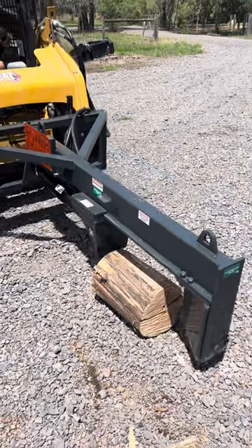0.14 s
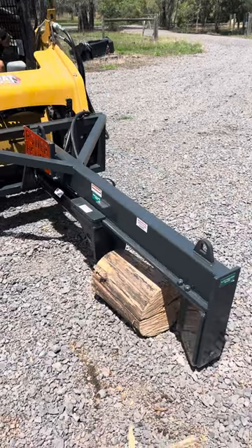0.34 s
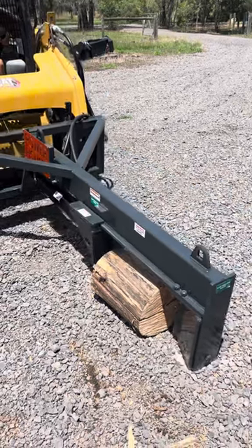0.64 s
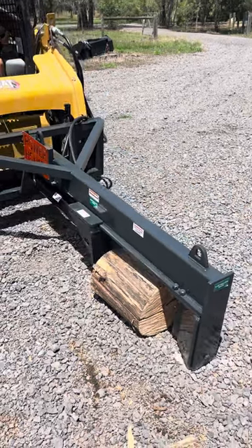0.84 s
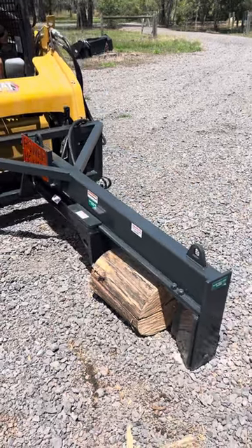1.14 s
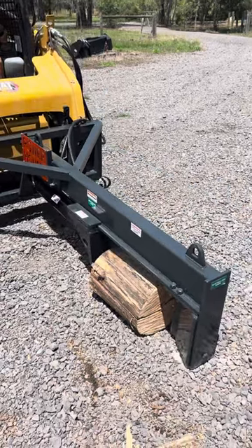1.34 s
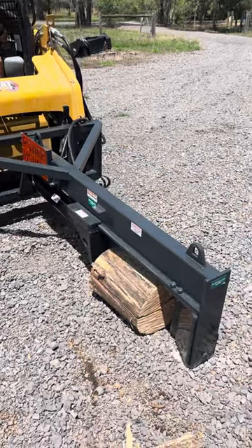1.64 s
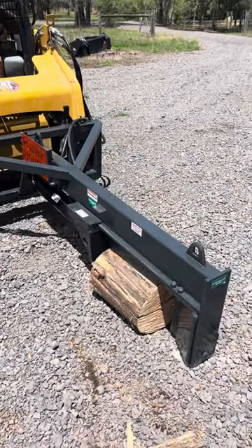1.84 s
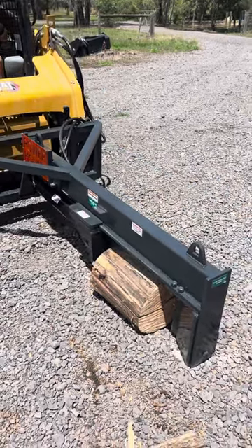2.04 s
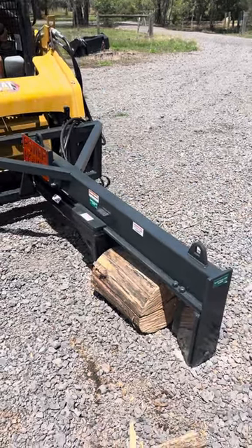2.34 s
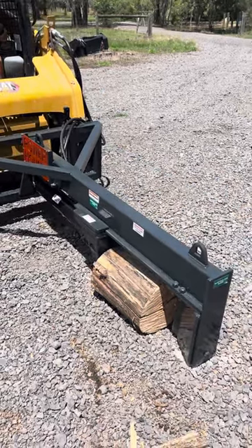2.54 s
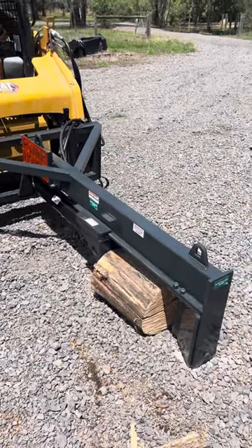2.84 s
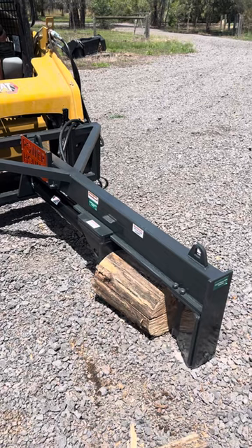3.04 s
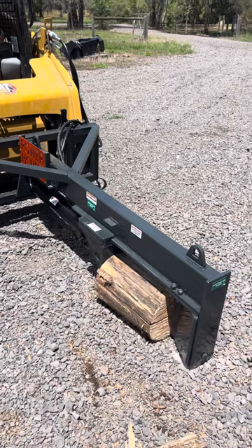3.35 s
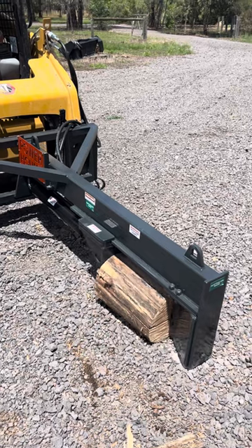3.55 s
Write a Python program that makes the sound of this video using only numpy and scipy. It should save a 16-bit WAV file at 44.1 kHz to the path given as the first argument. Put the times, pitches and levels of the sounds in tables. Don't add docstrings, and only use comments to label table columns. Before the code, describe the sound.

A high-idling diesel loader drones close by outdoors on gravel; it sags as the hydraulic ram strains, recovers with small crunches and a wind puff, and a log cracks at the end, caught by a phone.

```python
import sys
import numpy as np
from scipy import signal
from scipy.fft import rfft, irfft
from scipy.io import wavfile

SR = 44100
rng = np.random.default_rng(int(sys.argv[2]) if len(sys.argv) > 2 else 0)


def master(y):
    cut = np.clip(np.atleast_2d(y).T, -1, 1)
    pcm = np.round(cut * 32767)
    wavfile.write(sys.argv[1], SR, pcm.astype(np.int16))


def decibels_to_gain(level_db):
    exponent = np.asarray(level_db, float) / 20
    return 10 ** exponent


N = 162288

# time [s], rate [Hz].
FIRING = [(0, 81.56), (0.6, 81.8), (1.12, 81.84), (1.22, 79.37), (1.32, 75.85), (1.4, 75.82), (1.55, 76.87),
          (1.7, 77.03), (1.9, 77.0), (1.98, 80.36), (2.08, 82.3), (2.18, 81.75), (2.5, 81.68), (3.0, 81.69),
          (3.5, 81.66), (3.62, 81.34), (3.68, 81.34)]
FREE_HZ, SAG_HZ = 81.51, 6.24
# multiple of firing rate, level [dB], gain at full load [dB], phase [rad].
EXHAUST = [(.75, -45.5, -13, -3.1), (1, -11, 3, 0.52), (1.25, -36.5, -21, 8), (1.5, -38.5, -6.5, 6),
           (1.75, -44, 1.5, 3), (2, -23, 11, -1), (2.5, -48, -4.5, 2), (2.75, -57, 9.5, 1.5),
           (3, -37, 7, 2.5), (3.5, -52, -4, 2.96), (3.75, -54.5, 4, 2.3), (4, -46, 4, 0),
           (4.5, -63.5, -1.5, 6), (5.25, -57.5, 9, 3), (5.5, -60.5, 2.5, -1.9), (6, -43.5, -4, 1.44),
           (7, -48, -6.5, 7), (9, -52.5, 0.5, 0.26), (11, -53.5, -1, 5), (12, -58.5, 12.5, 5.5),
           (15, -50, 3, 6), (18, -58.5, -24.5, 6.5)]
# time [s], level of its tone [dB], strain lifting its overtones [dB].
PUMP = [(0, -48, -25), (1.15, -46, -25), (1.162, -36, -25), (1.2, -36, -22), (1.3, -36, -18),
        (1.46, -32, -14), (1.48, -30, -.1), (1.86, -31, -.1), (1.93, -45, -15), (2.06, -46, -20),
        (2.1, -31, -22), (3.5, -32, -22), (3.68, -32, -22)]
# multiple of the piston tone, level under it [dB].
PUMP_OVERTONES = [(2, -17), (3, -22), (4, -15.5), (6, -23), (10, -31), (12, -36)]
CYLINDER_DB = [-0.3, -17.5, -14, -1]
# frequency [Hz], density [dB per Hz].
BODY = [(25, -65), (60, -56.5), (130, -58.5), (300, -61), (550, -66), (900, -67.5), (1400, -74),
        (1800, -79.5)]
# frequency [Hz], density [dB per Hz].
HISS = [(1300, -93.5), (1900, -78), (3000, -75.5), (4000, -82), (6000, -87), (8600, -92.5), (11000, -94),
        (16500, -105)]
# multiple of its turning rate, level [dB], phase [rad].
FAN_TONES = [(7, -38, 1.5), (12, -41.5, 4.37), (14, -49.5, 2.2)]
# start [s], rise [s], fall [s], level [dB], tilt [dB per octave].
GRINDS = [(.003, .002, .03, -36, -9), (.505, .025, .022, -41, -2), (.6925, .0005, .001, -35, .5),
          (.7172, .0004, .0007, -33, 10), (.67, .03, .02, -49, 0), (1.157, .002, .03, -37, -16),
          (1.982, .001, .007, -30, -.5), (1.999, .003, .022, -27, -5), (3.507, .002, .03, -21, -8),
          (2.04, .008, .02, -33, -5), (2.0565, .001, .006, -34, .8), (2.065, .012, .04, -36, -3),
          (3.445, .002, .004, -52, 3), (3.547, .002, .04, -33, 0), (3.581, .004, .01, -22, -1.5),
          (3.594, .001, .002, -16, 2.5), (3.607, .004, .01, -24, -5), (3.62, .001, .007, -23, -3),
          (3.633, .001, .007, -23, -2.5), (3.648, .003, .008, -21, -3), (3.662, .006, .03, -24, -3)]
# frequency [Hz], width [Hz], boost [dB].
LOG_RESONANCES = [(430, 380, -4.5), (714, 320, 9), (1035, 310, 5), (1240, 87, 4.5), (2420, 1400, 4)]
# time [s], level [dB].
CRACK_BLOWS = [
    (3.5077, -15.5),
    (3.509, -21.5),
    (3.518, -12.5),
    (3.527, -12),
    (3.536, -22.5),
    (3.551, -21.5),
]
# frequency [Hz], level [dB], time to fall 60 dB [s].
CRACK_MODES = [(410, -9.5, 0.0088), (692, -40, 0.069), (1165, 5.5, 0.029), (1350, -1.5, 0.023),
               (1313, -5, 0.049), (1454, -1, 0.065), (1900, -6, 0.031), (2210, -10.5, 0.03),
               (2376, -12.5, 0.073), (3540, -15, 0.036)]
# time [s], pitch [Hz], level [dB].
SNAPS = [(1.158, 414, -22.5), (1.161, 560, -28), (1.178, 492, -27.5), (1.2, 430, -31.5), (1.225, 402, -25),
         (2.002, 618, -18.5), (2.002, 339, -20.5), (2.002, 1017, -25), (2.011, 993, -30.5),
         (2.017, 720, -19), (2.02, 1310, -31.5), (2.033, 690, -25.5), (2.042, 540, -30),
         (2.045, 1300, -36.5), (2.059, 1666, -43), (2.064, 1240, -26.5), (2.089, 1135, -31.5),
         (3.507, 1330, -12.5), (3.51, 406, -17.5), (3.513, 1203, -16), (3.52, 1367, -21),
         (3.526, 1230, -19), (3.526, 1860, -24.5), (3.54, 1260, -26), (3.55, 1313, -20), (3.556, 1220, -21),
         (3.568, 1238, -20), (3.582, 693, -26.5), (3.586, 2030, -24), (3.586, 904, -12.5),
         (3.586, 1240, -15.5), (3.59, 1045, -19.5), (3.593, 1422, -18), (3.597, 3660, -28.5),
         (3.609, 677, -19.5), (3.611, 527, -22.5), (3.609, 226, -19.5), (3.622, 195, -21.5),
         (3.629, 225, -23.5), (3.617, 440, -25), (3.619, 1556, -19.5), (3.62, 2170, -27), (3.621, 702, -15),
         (3.622, 1323, -20), (3.631, 1255, -16.5), (3.633, 947, -15), (3.633, 1282, -22),
         (3.639, 343, -16.5), (3.646, 426, -18.5), (3.647, 607, -20), (3.647, 995, -21.5),
         (3.651, 312, -13), (3.653, 1370, -16), (3.653, 2640, -21.5), (3.658, 1112, -16.5),
         (3.666, 1057, -17.5), (3.665, 1270, -21), (3.671, 274, -19.5), (3.671, 513, -24.5),
         (3.671, 670, -22)]
# centre [s], half length [s], level [dB].
GUSTS = [
    (.01, .03, -28),
    (2.17, .035, -21),
    (2.23, .02, -24),
    (2.3, .04, -21),
    (2.4, .04, -25),
    (2.58, .04, -30),
    (3.52, .02, -28),
    (3.64, .04, -24),
]
# frequency [Hz], lead [rad],
# balance [dB].
MACHINE_PORTS = [(80, -.02, .5), (250, -.34, 2.6), (420, -1.1, 3.2), (600, -1.6, -4), (1300, -2.1, -3),
                 (1700, .05, -1.5),
                 (2700, 2.65, -.6), (3300, 2.65, .6), (3800, 2.2, 1), (4400, 3.14, 1), (5000, 2.0, -1),
                      (5500, 2.5, -.6)]
# frequency [Hz], lead [rad], balance [dB].
LOG_PORTS = [(80, -.02, .5), (430, -1.2, 2), (750, -1.9, -4), (1400, -1.5, -4), (1900, .3, -1),
             (2800, 2.7, -4), (3900, 1.2, -1), (5500, 2.6, 0)]


def slow(rate):
    r = np.exp(-80 * np.pi * rate / SR)
    s = signal.lfilter([1], [1, -2 * r, r * r], rng.standard_normal(N // 40 + 2002))[2000:]
    return np.interp(np.arange(N) / 40, np.arange(len(s)), s / s.std())


def coloured(x, points):
    hz = np.arange(N // 2 + 1) * SR / N + 1
    p = np.array(points)
    db = np.interp(np.log(hz), np.log(p[:, 0]), p[:, 1], left=-200, right=-200)
    return irfft(rfft(x) * decibels_to_gain(db) * np.sqrt(SR / 2), N)


def resonance(x, hz, width_hz):
    r = np.exp(-np.pi * width_hz / SR)
    poles = [1, -2 * r * np.cos(2 * np.pi * hz / SR), r * r]
    return signal.lfilter(np.array([1, 0, -1]) * (1 - r * r) / 2, poles, x + 1e-18)


def band(x, order, low_hz, high_hz):
    return signal.sosfilt(signal.butter(order, [low_hz, high_hz], "band", fs=SR, output="sos"), x)


def curve(rows):
    s, *columns = np.transpose(rows)
    return [np.interp(np.arange(N) / SR, s, c) for c in columns]


def exhaust(turns, load):
    out = 0
    for k, db, load_db, rad in EXHAUST:
        k = np.round(k * 4) / 4
        waver_db = 3.5 * np.clip((-db - 9.0) / 30, .05, 1) * slow(3.0)
        phase = 2 * np.pi * k * turns + rad - 0.53 * load * (k - 1)
        out = out + decibels_to_gain(db + load_db * load + waver_db) * np.cos(phase)
    return np.sqrt(2) * out


def pump(turns):
    db, strain_db = curve(PUMP)
    phase = 2 * np.pi * 5 * turns
    out = decibels_to_gain(db + 0.27 * slow(5.1)) * np.cos(phase + 0.75)
    for k, under_db in PUMP_OVERTONES:
        level_db = db + strain_db + under_db + 2.2 * slow(10)
        out += decibels_to_gain(level_db) * np.cos(k * phase + .15 * slow(12))
    relief_hz, relief_width_hz, relief_db = 8510, 1300, -52
    relief = resonance(rng.standard_normal(N), relief_hz, relief_width_hz)
    relief = resonance(relief, relief_hz, relief_width_hz)
    return np.sqrt(2) * out + decibels_to_gain(relief_db + .5 * strain_db) * relief / relief.std()


def engine_body(turns):
    strength = decibels_to_gain(np.array(CYLINDER_DB)[turns.astype(int) % 4])
    knocks = np.diff(np.floor(turns), prepend=0) * strength * decibels_to_gain(1.9 * rng.standard_normal(N))
    swell = 1 + 0.14 * strength * np.cos(2 * np.pi * turns)
    noise = rng.standard_normal((2, N)) * swell
    drive = 0.078 * knocks / knocks.std() + noise
    body = coloured(drive[0] * decibels_to_gain(1.1 * slow(10)), BODY)
    hiss = coloured(drive[1] * decibels_to_gain(.5 * slow(10)), HISS)
    whine_hz, whine_width_hz = 8370, 14
    whine = resonance(rng.standard_normal(N), whine_hz, whine_width_hz) * np.sqrt(SR / whine_width_hz / np.pi)
    whine_db = -59.5 - 2.5 * np.arange(N) / SR
    return body + hiss + decibels_to_gain(whine_db) * whine


def fan(hz, load):
    turning_hz = 41.03 - .295 * np.maximum(FREE_HZ - hz, 0)
    turns = np.cumsum(turning_hz) / SR
    out = 0
    for k, db, rad in FAN_TONES:
        level_db = db - 4 * load + 1.3 * slow(2.5)
        out = out + decibels_to_gain(level_db) * np.sqrt(2) * np.cos(2 * np.pi * np.round(k) * turns + rad)
    return out


def grinding():
    grains_per_s, grain_spread_db = 12000, 1.8
    grains = (rng.random(N) < grains_per_s / SR) * rng.choice([-1, 1], N)
    grains = grains * decibels_to_gain(grain_spread_db * rng.exponential(1, N))
    grains = grains / grains.std()
    out = np.zeros(N)
    size, lead = 8192, 64
    for s, rise, fall, db, tilt_db in GRINDS:
        i = int(s * SR)
        t = np.arange(min(size, N - i)) / SR
        burst = grains[i:i + size] * np.minimum(t / rise, 1) * np.exp(-np.maximum(t - rise, 0) / fall)
        burst[int(rise * SR)] += decibels_to_gain(13) * (rise < .0015)
        hz = np.clip(np.arange(size // 2 + 1) * SR / size, 350, 13000)
        gain = decibels_to_gain(tilt_db * np.log2(hz / 1000))
        gain = gain / np.sqrt(np.mean(gain ** 2))
        padded = np.roll(np.pad(burst, (0, size - len(t))), lead)
        shaped = irfft(rfft(padded) * gain, size)
        out[i - lead:i - lead + size] += decibels_to_gain(db) * shaped[:N - i + lead]
    out = band(out, 2, 200, 13500)
    return out + sum(decibels_to_gain(db) * resonance(out, hz, width_hz) for hz, width_hz, db in LOG_RESONANCES)


def crack():
    t = np.arange(N) / SR
    splinter_s = .004
    blows = sum(decibels_to_gain(db) * np.exp(-np.maximum(t - s, 0) / splinter_s) * (t > s) for s, db in CRACK_BLOWS)
    out = 0
    for hz, mode_db, t60 in CRACK_MODES:
        drive = decibels_to_gain(mode_db - 20.5) * blows * rng.standard_normal(N)
        r = decibels_to_gain(-60 / (t60 * SR))
        w = 2 * np.pi * hz / SR
        out = out + signal.lfilter([0, np.sin(w)], [1, -2 * r * np.cos(w), r * r], drive + 1e-18)
    return signal.sosfilt(signal.butter(2, 4000, fs=SR, output="sos"), out)


def snaps():
    out = np.zeros(N + 4096)
    t = np.arange(4096) / SR
    rise_s, fall_s = .0008, .0038
    shape = (1 - np.exp(-t / rise_s)) * np.exp(-t / fall_s)
    for s, hz, db in SNAPS:
        i = int(s * SR)
        rad = rng.uniform(0, 2 * np.pi)
        out[i:i + len(t)] += decibels_to_gain(db + 7.5) * shape * np.sin(2 * np.pi * hz * t + rad)
    return out[:N]


def ground_scatter():
    noise = rng.standard_normal((2, N))
    return decibels_to_gain(-11.5) * np.array([coloured(v, BODY[2:]) + coloured(v, HISS) for v in noise])


def wind():
    t = np.arange(N) / SR
    gust = sum(decibels_to_gain(db) * np.exp(-((t - s) / half) ** 2) for s, half, db in GUSTS)
    low = band(rng.standard_normal((2, N)), 1, 45, 133)
    low = band(low, 2, 38, 260)
    mid, side = low / low.std() * gust * decibels_to_gain(slow(23))
    return mid + decibels_to_gain(-13.5) * side * [[1], [-1]]


def ports(x, table, top_rad):
    hz = np.arange(N // 2 + 1) * SR / N
    p = np.array(table)
    above = hz - p[-1, 0]
    lag_s, dwell_rad = .000229, .3
    lead = np.interp(hz, p[:, 0], p[:, 1]) + 2 * np.pi * lag_s * np.maximum(above, 0)
    lead = np.minimum(lead, top_rad) - dwell_rad * np.sin(2 * lead) * (above > 0)
    half = decibels_to_gain(np.interp(hz, p[:, 0], p[:, 2]) / 2) * np.exp(.5j * lead)
    return irfft(rfft(x) * np.array([half, 1 / half]), N)


def scene():
    hz, = curve(FIRING)
    turns = np.cumsum(hz) / SR + 0.2015
    load = np.clip((FREE_HZ - hz) / SAG_HZ, 0, 1.3)
    machine = exhaust(turns, load) + pump(turns) + engine_body(turns) + fan(hz, load)
    log = grinding() + crack() + snaps()
    heard = ports(machine, MACHINE_PORTS, 5 * np.pi)
    heard += ports(log, LOG_PORTS, 5.3 * np.pi)
    heard += [decibels_to_gain(-10) * np.pad(log, (int(s * SR), 0))[:N] for s in (.0071, .0093)]
    return heard + ground_scatter() + wind()


def top_cut(x):
    return signal.sosfilt(signal.butter(12, 15990, fs=SR, output="sos"), x)


def record(dry):
    peak = 1.2
    rounded = peak * np.tanh(dry / peak)
    below_cutoff = np.arange(N // 2 + 1) * SR / N < 15950
    mix = irfft(rfft(rounded) * below_cutoff, N)
    return top_cut(mix)


dry = scene()
out = record(dry)
master(out)
```